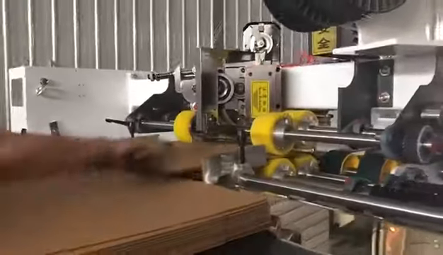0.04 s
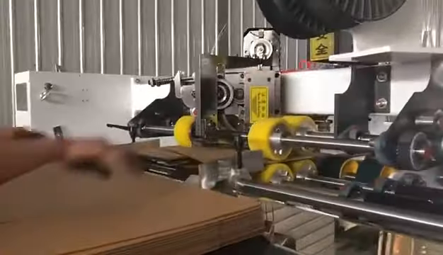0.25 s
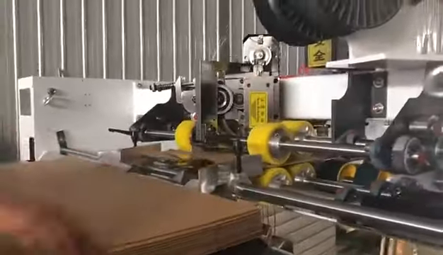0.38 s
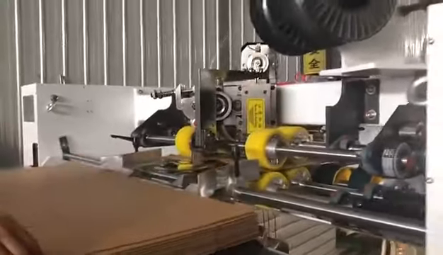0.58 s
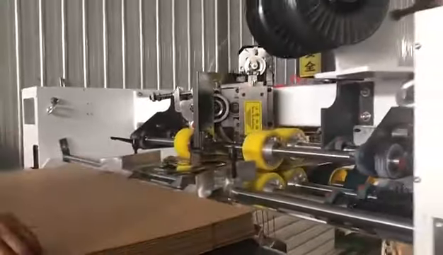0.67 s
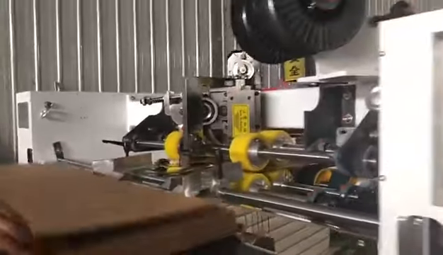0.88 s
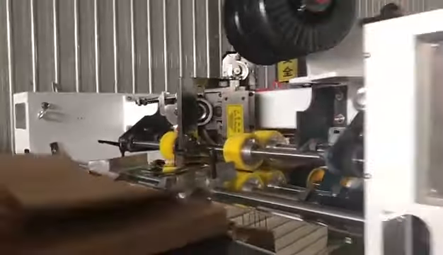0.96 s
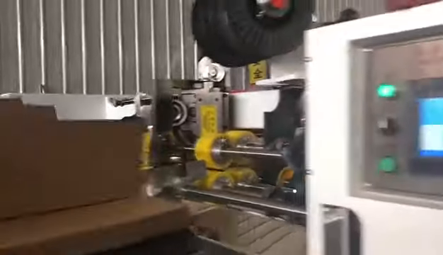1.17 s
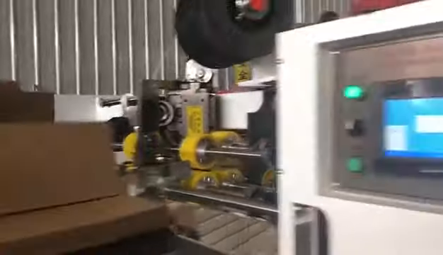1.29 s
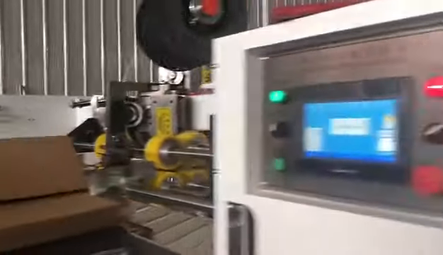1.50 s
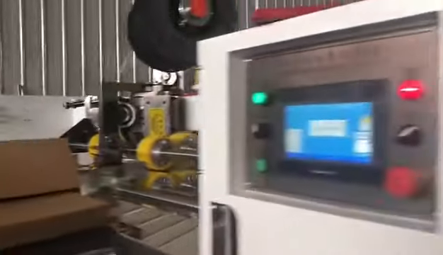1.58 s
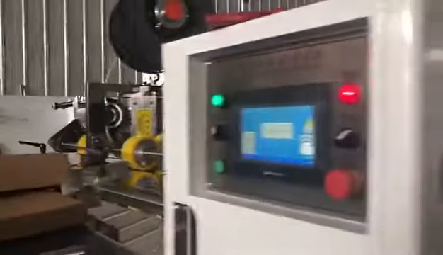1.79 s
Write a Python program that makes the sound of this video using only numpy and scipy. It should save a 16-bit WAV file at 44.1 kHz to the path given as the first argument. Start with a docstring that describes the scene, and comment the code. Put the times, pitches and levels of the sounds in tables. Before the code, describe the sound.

Close by in a workshop, a machine staples cardboard with four rapid metallic clacks, each with wire snaps and a thump. Softer scrapes and knocks follow as the carton leaves, over a steady machine hum and a faint whine.

```python
"""A carton stitcher drives four wire staples, six a second, close to one phone microphone in a workshop.
The clutch clacks in; each stroke is a run of rattling steel blows with two dry snaps of wire and a
thump that rings the frame. The carton knocks and slides out over the rollers while the drive hums on.
Behind the machine are the echo of the sheet-metal walls and the steady noise of the shop."""
import sys
import numpy as np
from scipy import signal
from scipy.fft import rfft, irfft
from scipy.io import wavfile
from scipy.ndimage import uniform_filter1d

SR = 44100
rng = np.random.default_rng(int(sys.argv[2]) if len(sys.argv) > 2 else 0)


def store_pcm(level_fs):
    """Save levels as 16-bit WAV."""
    pcm = np.round(np.clip(level_fs, -1, 1) * 32767).astype(np.int16)
    wavfile.write(sys.argv[1], SR, np.atleast_2d(pcm).T)


N = 81585

# One row per staple: start_s, cut_db, cut_decay_s, frame_gain_db, table_gain_db
STAPLES = [(.290, -16.5, 0.017, -3, -8), (.461, -10, 0.013, 1, -12), (.632, -13, 0.0086, -11, -17),
           (.803, -11.5, .014, -7.5, 3)]
# Blows of the head around the cuts, mostly drive, clinch and return after them, a few just before: start_s,
# level_db, rise_s, decay_s, tilt_db_per_octave
STROKE_BLOWS = [(.317, -13, 0.0025, 0.023, 1), (.342, -16, .004, 0.024, -1), (.357, -24, 0.0047, .012, 6),
                (.372, -19.5, 0.0038, 0.015, -0.5), (.398, -24, .004, 0.02, 1.5),
                (.487, -14.5, 0.0029, 0.016, 0.5), (.515, -19, 0.0042, 0.025, -3),
                (.533, -16, 0.0098, .014, 0.5), (.601, -26.5, 0.0044, 0.01, -5.5),
                (.626, -21, .004, 0.0077, -7), (.659, -15.5, 0.0025, 0.013, 5.5),
                (.683, -14.5, 0.0025, 0.013, 0.5), (.698, -18.5, 0.0095, 0.023, -1.1),
                (.832, -16.5, 0.0029, .012, -1), (.849, -17, 0.005, 0.0037, -0.5),
                (.868, -17.5, 0.0028, 0.019, 1), (.882, -20.5, 0.0023, 0.017, -1)]
# Wire feed leading into each cut: offset_s, level_db, rise_s, decay_s, tilt_db_per_octave
FEED_BLOWS = [(-0.025, -20, 0.025, 0.026, 3)]
# Colour of the steel head: frequency_hz, relative_db
HEAD_COLOUR = [(25, -55.5), (60, -29), (250, -10.5), (550, 5), (800, -4), (1500, -1), (2200, -2.5),
               (3100, 1.5), (4200, -4), (5200, -5), (6200, -11), (7500, -17.5)]
# Broad resonances of the cutter: frequency_hz, relative_db
CUTTER_COLOUR = [(60, -18.5), (250, -6.5), (570, 3.5), (850, -6.5), (1150, 3), (1500, -14.5), (1800, 6.5),
                 (2150, -6.5), (2900, 8.5), (3250, 2.5), (4200, -1.5), (4800, -2.5), (6050, -11),
                 (6500, -7.5), (7500, -10.5)]
# Modes of the head: pitch_hz, relative_db, t60_s
HEAD_MODES = [(568, 2, .37), (1180, -6.5, 0.27), (1750, -2, 0.13), (1960, 2, 0.38), (2428, -1.5, 0.65),
              (2665, -8, .2), (2946, -3, .16), (3368, -2.5, 0.54), (3400, -4.5, .22), (3560, -13, 0.15),
              (3780, -1.5, .22), (4050, -6, .2), (4110, -3, 0.12)]
# Cut and clinch setting the head ringing: delay_s, gain_db
HEAD_STRIKES = [(.005, -1.5), (.049, -1)]
# Snaps of the wire: start_s, level_db
WIRE_SNAPS = [(0.2937, -9), (0.325, -13.5), (0.4678, -17.5), (0.4957, -13.5), (0.6377, -11),
              (0.6656, -16.5), (0.807, -23.5), (0.838, -14.5)]
# Colour of a snap: frequency_hz, relative_db
SNAP_COLOUR = [(300, -25), (2500, -17.5), (3750, -0.5), (4200, 4.5), (4650, -7), (5700, -27.5), (6500, -8),
               (7500, -18)]
# Modes of the frame: pitch_hz, relative_db, t60_s
FRAME_MODES = [(196.9, -10, .33), (243.2, -23.5, 0.38), (386.6, -25.5, 0.38), (574.5, -23, .12)]
# Modes of the table: pitch_hz, relative_db, t60_s
TABLE_MODES = [(141.6, -21.5, .6), (263.3, -28.5, 0.51), (506, -30.5, 0.13)]
# Touch and grip of the clutch: start_s, level_db, rise_s, decay_s, tilt_db_per_octave
CLUTCH_BLOWS = [(.194, -27, 0.0067, 0.017, 4.5), (.2098, -15, 0.0024, 0.029, 1.5)]
# Colour of the clutch: frequency_hz, relative_db
CLUTCH_COLOUR = [(30, 0.5), (120, -7), (230, -1), (330, -1.5), (550, 4), (1100, -2), (2200, -9),
                 (4000, -9.5), (5200, -18), (7500, -18)]

# Low thuds under the third and fourth strokes, then the carton against rollers and table: start_s, level_db,
# rise_s, decay_s, tilt_db_per_octave
CARTON_KNOCKS = [(.654, -23.5, 0.0059, .025, -3.5), (.84, -18.5, 0.0032, 0.029, 2),
                 (.924, -26, 0.0032, 0.017, -4.5), (1.019, -21.5, .012, 0.052, -2),
                 (1.06, -27.5, 0.0042, 0.088, -1.4), (1.108, -36, 0.0055, 0.041, 7),
                 (1.2665, -29, 0.0016, 0.049, 6), (1.300, -32.5, 0.0049, 0.0094, 8),
                 (1.305, -23.5, 0.016, 0.031, -3), (1.399, -32, 0.00081, 0.025, 2.5),
                 (1.422, -38.5, 0.0062, 0.045, 4), (1.482, -34.5, .004, 0.0097, 4),
                 (1.57, -34, 0.012, 0.015, -4.5), (1.675, -40, 0.0018, 0.0053, 5.5)]
# Colour of knocked cardboard: frequency_hz, relative_db
KNOCK_COLOUR = [(20, -49.5), (45, -19), (90, -8.5), (140, 1.5), (230, -0.5), (400, -2.5), (650, 0),
                (1200, -9), (2200, -7), (3200, -12.5), (4500, -16), (7500, -28.5)]
# The carton sliding: time_s, level_db
SLIDE_LEVELS = [(0, -63), (.19, -39.5), (.3, -27), (.9, -27), (.99, -30.5), (1.07, -26), (1.15, -36),
                (1.24, -32), (1.33, -29), (1.43, -29), (1.55, -31.5), (1.68, -31.5), (1.85, -35.5)]
# Colour of sliding cardboard: frequency_hz, relative_db
SLIDE_COLOUR = [(80, -10), (220, 8.5), (400, 5.5), (650, 0), (1000, 1.5), (1600, -2), (2600, -9),
                (4000, -18.5), (6000, -44), (7500, -44.5)]
# Modes of the roller bed: pitch_hz, level_db, t60_s
BED_MODES = [(218.6, -26, 1.05), (376, -31, 0.61)]

# Rumble of the rollers: time_s, level_db
ROLLER_LEVELS = [(0, -35), (.12, -35), (.3, -25), (.6, -26.5), (.8, -26), (1.1, -34.5), (1.25, -37.5),
                 (1.5, -43.5), (1.85, -41.5)]
# Colour of the rumble: frequency_hz, relative_db
ROLLER_COLOUR = [(25, -34), (55, -14.5), (80, -8), (110, -2), (135, -4.5), (165, -1), (220, -1.5),
                 (300, -8.5), (600, -29), (2000, -33.5)]
# Hum of the motor: pitch_hz, level_db
MOTOR_TONES = [(75, -42.5), (96, -47), (380, -47.5), (668, -46)]
# Whine of the outfeed: time_s, level_db
WHINE_LEVELS = [(0, -60), (.95, -54.5), (1.25, -43), (1.45, -36.5), (1.85, -43.5)]
# The shaken table droning at its lowest mode: time_s, level_db
DRONE_LEVELS = [(0, -42.5), (.15, -28), (.45, -43), (.76, -29), (.95, -31), (1.15, -35.5), (1.5, -39.5),
                (1.85, -41.5)]
# Room tone of the shop: frequency_hz, relative_db
SHOP_COLOUR = [(25, -25.5), (100, -8.5), (300, -5), (620, -2.5), (900, -10), (2000, -17.5), (4000, -22),
               (6000, -26.5), (7500, -35.5)]

HEAD_RING_DB, HEAD_GRAIN, HEAD_DETUNE = -31.5, 0.21, 0.0025
CATCH_PER_S, CATCH_DECAY_S, CATCH_DB, CATCH_SPREAD_DB = 110, 0.005, -8, 3
ROOM_T60_S, ROOM_TREBLE_T60_S, ROOM_DB, ROOM_DELAY_S = 1, 0.75, -10, 0.0072
PATCH_DB, PATCH_SPACING_HZ = 2.5, 170  # chance resonances of each contact
TOP_HZ, CEILING = 7650, 0.8


def stitcher_head():
    """Wire feed, cut, drive, clinch and return rattle the steel head; cut and clinch leave it ringing."""
    out = blows(STROKE_BLOWS, HEAD_COLOUR, HEAD_GRAIN)
    for start, cut_db, decay, *_ in STAPLES:
        out += blows(FEED_BLOWS, HEAD_COLOUR, HEAD_GRAIN, start)
        cut = noise(CUTTER_COLOUR, tilt_db=-0.5, grain=HEAD_GRAIN, patch_db=PATCH_DB)
        out += undb(cut_db) * envelope(start, rise_s=0.0071, decay_s=decay) * cut
        for delay, gain_db in HEAD_STRIKES:
            modes = [(hz * (1 + HEAD_DETUNE * rng.standard_normal()), db, t60)
                     for hz, db, t60 in HEAD_MODES]
            out += undb(HEAD_RING_DB + gain_db) * ring(modes, start + delay, rise_s=0.015)
    return out


def wire_snaps():
    """The wire snaps with a dry, bright tick as it is cut and again as it is driven."""
    ticks = sum(undb(db) * envelope(start, rise_s=0.0018, decay_s=0.003) for start, db in WIRE_SNAPS)
    return ticks * noise(SNAP_COLOUR)


def staple_thumps(delay_s=0.037, rise_s=0.0053):
    """Each staple going home rings the frame and the table."""
    out = np.zeros(N)
    for start, *_, frame_db, table_db in STAPLES:
        out += undb(frame_db) * ring(FRAME_MODES, start + delay_s, rise_s)
        out += undb(table_db) * ring(TABLE_MODES, start + delay_s, rise_s)
    return out


def clutch():
    """The clutch touches lightly, then grips with a clack."""
    return blows(CLUTCH_BLOWS, CLUTCH_COLOUR, grain=0.18)


def carton():
    """Cardboard scrapes through the machine, thuds dully under the later strokes, knocks on its way out and
    drops on the ringing roller bed."""
    scrape = curve(SLIDE_LEVELS) * noise(SLIDE_COLOUR, grain=0.13) * friction()
    knocks = blows(CARTON_KNOCKS, KNOCK_COLOUR, grain=0.15)
    return scrape + knocks + ring(BED_MODES, start_s=1.07, rise_s=0.017)


def friction(flutter_db=1.4):
    """Strength of the scrape: a fluttering drag, with the board catching and slipping at random."""
    catches = rng.random(N) < CATCH_PER_S / SR
    strengths = undb(CATCH_SPREAD_DB * np.clip(rng.standard_normal(N), -2, 2))
    slips = signal.lfilter([1], [1, -np.exp(-1 / (CATCH_DECAY_S * SR))], catches * strengths)
    drag = undb(flutter_db * wander(50))
    return unit(drag + undb(CATCH_DB) * unit(slips))


def drive():
    """Under the strokes the motor hums, the outfeed whines, the table drones and the rollers rumble."""
    hum = sum(undb(db) * wavering_tone(hz) for hz, db in MOTOR_TONES)
    whine = curve(WHINE_LEVELS) * wavering_tone(pitch_hz=855)
    drone = curve(DRONE_LEVELS) * wavering_tone(pitch_hz=136)
    rumble = curve(ROLLER_LEVELS) * noise(ROLLER_COLOUR)
    return hum + whine + drone + rumble


def wall_echo(direct):
    """Diffuse echo off the metal walls, just behind the direct sound; the treble dies first."""
    wash = rng.standard_normal(N)
    low = signal.sosfilt(signal.butter(2, 2000, fs=SR, output="sos"), wash)
    tail = low * envelope(ROOM_DELAY_S, 0.0033, ROOM_T60_S / np.log(1000))
    tail += (wash - low) * envelope(ROOM_DELAY_S, 0.023, ROOM_TREBLE_T60_S / np.log(1000))
    return undb(ROOM_DB) * signal.fftconvolve(direct, tail / np.linalg.norm(tail))[:N]


def room_tone(level_db=-36):
    """Steady noise of the shop behind the machine."""
    return undb(level_db) * noise(SHOP_COLOUR)


def blows(rows, colour, grain, start_s=0):
    """Bursts of chattering contact, each with resonances of its own."""
    return sum(undb(db) * envelope(start_s + at, rise, decay) * noise(colour, tilt, grain, PATCH_DB)
               for at, db, rise, decay, tilt in rows)


def ring(modes, start_s, rise_s):
    """Decaying modes struck at one moment."""
    age = np.maximum(clock() - start_s, 0)
    return sum(undb(db) * np.sin(2 * np.pi * hz * age) * envelope(start_s, rise_s, t60 / np.log(1000))
               for hz, db, t60 in modes)


def wavering_tone(pitch_hz, waver_db=2.5):
    """A tone that wavers in level and slightly in pitch."""
    gain = undb(waver_db * wander(10.13))
    hz = pitch_hz * (1 + 0.0023 * wander(9.35))
    return gain * np.sin(2 * np.pi * np.cumsum(hz) / SR)


def noise(colour, tilt_db=0, grain=0, patch_db=0):
    """Coloured noise, tilted per octave; grain bunches it into tiny impacts, patches add resonances."""
    hz = np.maximum(np.arange(N // 2 + 1) * SR / N, 1)
    colour_hz, colour_db = np.array(colour).T
    patches = np.interp(hz / PATCH_SPACING_HZ, np.arange(256), np.clip(rng.standard_normal(256), -2, 2))
    patches *= np.minimum(hz / 1500, 1)  # shallower in the bass
    shape_db = np.interp(np.log(hz), np.log(colour_hz), colour_db)
    shape_db += tilt_db * np.log2(hz / colour_hz[0]) + patch_db * patches
    bunches = np.exp(grain * np.clip(wander(900), -2, 2))
    spectrum = rfft(rng.standard_normal(N) * bunches)
    return unit(irfft(spectrum * undb(shape_db) * (hz < TOP_HZ), N))


def envelope(start_s, rise_s, decay_s):
    """Straight rise, then an exponential fall."""
    age = clock() - start_s
    return np.clip(age / rise_s, 0, 1) * np.exp(-np.maximum(age - rise_s, 0) / decay_s)


def wander(rate_hz):
    """Smooth random drift with a spread near 1."""
    hold = int(SR / rate_hz)
    steps = np.repeat(rng.standard_normal(N // hold + 1), hold)
    return 1.16 * uniform_filter1d(steps, hold)[:N]


def curve(rows):
    """Gain that follows points of time_s, level_db."""
    return undb(np.interp(clock(), *np.array(rows).T))


def undb(db):
    return 10 ** (np.asarray(db) / 20)


def unit(x):
    return x / np.sqrt(np.mean(x ** 2))


def clock():
    return np.arange(N) / SR


def scene():
    """The stitcher from close by, in mono; head, wire and clutch echo off the walls."""
    clacks = stitcher_head() + wire_snaps() + clutch()
    return (clacks + wall_echo(clacks) + staple_thumps() + carton() + drive() + room_tone())[None]


def record(dry):
    """The phone microphone rounds the loudest peaks and cuts the top steeply."""
    rounded = CEILING * np.tanh(dry / CEILING)
    return signal.sosfilt(signal.ellip(10, 0.2, 80, TOP_HZ, fs=SR, output="sos"), rounded)


dry = scene()
out = record(dry)
store_pcm(out)
```